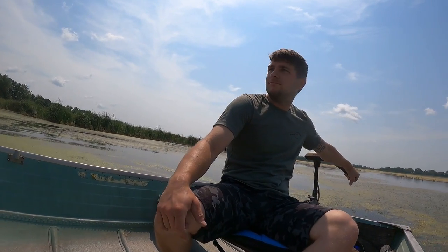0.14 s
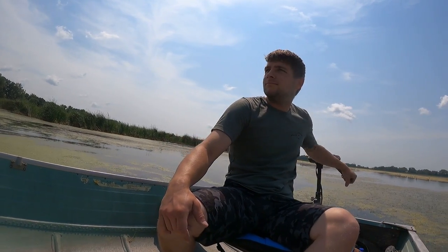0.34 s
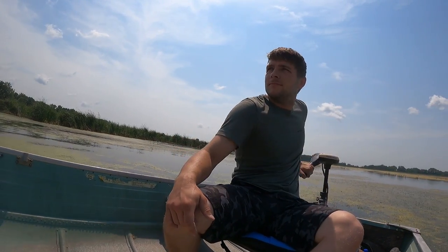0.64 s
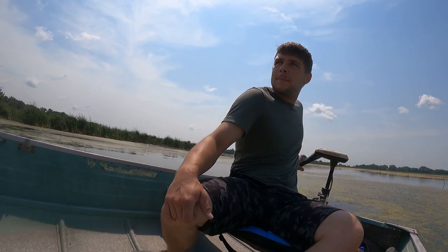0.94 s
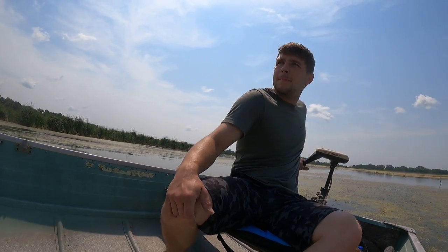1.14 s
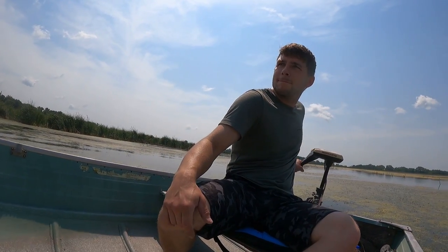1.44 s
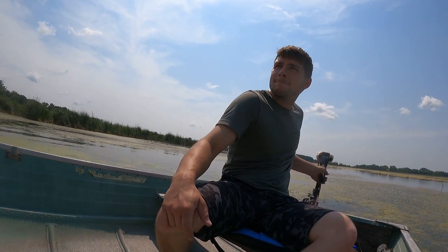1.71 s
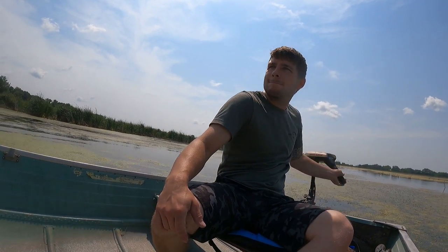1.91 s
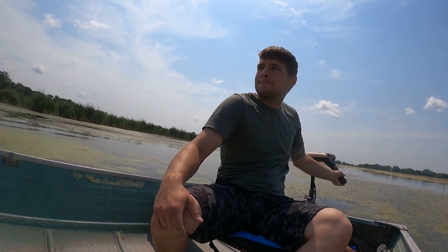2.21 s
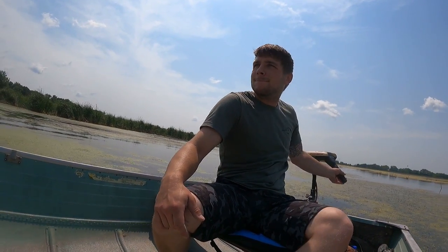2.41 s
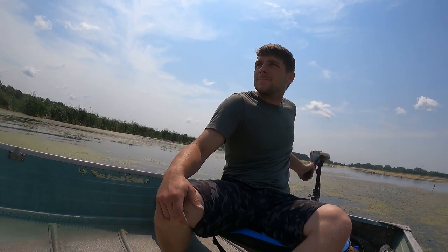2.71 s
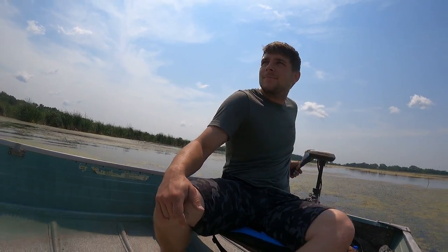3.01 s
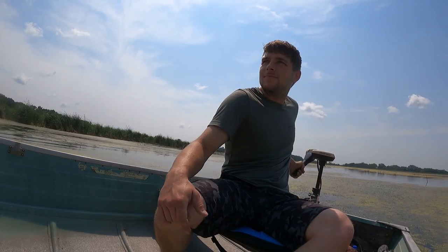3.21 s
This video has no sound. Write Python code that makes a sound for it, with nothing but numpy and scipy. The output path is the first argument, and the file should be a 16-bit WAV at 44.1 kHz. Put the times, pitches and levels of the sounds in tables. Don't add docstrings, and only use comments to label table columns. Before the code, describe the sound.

An electric boat motor buzzes in two bursts, shaking a metal hull, with knocks between them.

```python
import sys
import numpy as np
from scipy import signal
from scipy.io import wavfile
from scipy.ndimage import uniform_filter1d

SR = 44100
rng = np.random.default_rng(int(sys.argv[2]) if len(sys.argv) > 2 else 0)


def generate_wav(signal):
    frames = np.transpose(np.atleast_2d(signal))
    scaled = np.clip(frames, -1, 1) * 32767
    pcm = np.round(scaled).astype(np.int16)
    wavfile.write(sys.argv[1], SR, pcm)


def volts_from_db(level):
    exponent = np.asarray(level, float) / 20
    return 10 ** exponent


N = 147735
TIME_S = np.arange(N) / SR


def col(table, index):
    rows = np.array(table, float)
    return np.interp(TIME_S, rows[:, 0], rows[:, index])


def gate(table):
    rise = (TIME_S - table[0][0]) / 0.0079
    fall = (table[-1][0] - TIME_S) / 0.027
    return np.clip(np.minimum(rise, fall), 0, 1)


def hump(start, length, steep):
    from_middle = np.abs(2 * (TIME_S - start) / length - 1)
    return np.clip(steep - steep * from_middle, 0, 1)


def unit(x):
    return x / np.sqrt(np.mean(x ** 2))


def peak(x):
    return x / np.abs(x).max()


def band(x, hz, width):
    return signal.lfilter(*signal.iirpeak(min(hz, .45 * SR), hz / width, SR), x)


def walk(rate):
    k = int(SR / rate)
    steps = np.repeat(rng.standard_normal(600), k)[:N]
    curve = uniform_filter1d(uniform_filter1d(steps, k), k)
    return (curve - curve.mean()) / curve.std()


def bands(source, table, lo_hz, hi_hz, flicker_db, rate):
    rows, out = np.array(table, float), 0
    for hz in lo_hz * 2 ** (np.arange(30) / 3):
        if hz < hi_hz:
            db = np.interp(np.log(hz), np.log(rows[:, 0]), rows[:, 1]) + flicker_db * walk(rate)
            out = out + volts_from_db(db) * band(band(source, hz, hz / 3), hz, hz / 3)
    return unit(out)


def motor_grit():
    roughness_db = 1.5 * 8 * uniform_filter1d(rng.standard_normal(N), size=60)
    return unit(rng.standard_normal(N) * volts_from_db(roughness_db))


# time_s, buzz level_db
MOTOR_LOAD = [
    [(.222, -32.5), (.29, -27), (.4, -32.5), (.52, -33), (.75, -34.5), (.83, -36), (.9, -37), (.96, -56.5)],
    [(1.475, -47.5), (1.51, -33), (1.7, -33), (2.25, -35), (2.42, -31.5), (2.72, -34), (3.0, -32.5),
     (3.09, -49)],
]


def motor_load():
    return [gate(burst) * volts_from_db(col(burst, index=1)) for burst in MOTOR_LOAD]


# start_s, length_s, peak level_db, pitch_hz
SURGES = [(.235, 0.017, -18, 265), (.255, 0.032, -14.5, 269.9), (.301, 0.049, -19.5, 272.7),
          (.338, 0.051, -8.5, 279.4), (.397, 0.032, -8, 277.6), (.44, 0.055, -10, 278.2),
          (.495, 0.064, -15.5, 279.8), (.57, 0.032, -17.5, 278), (.614, 0.19, -9.5, 277.7),
          (.803, 0.034, -23, 277), (.86, 0.026, -23.5, 275), (.895, 0.018, -24.5, 277),
          (1.498, 0.053, -11.5, 283.8), (1.578, 0.019, -10, 277.6), (1.609, 0.029, -17.5, 288.8),
          (1.65, 0.03, -15, 269.3), (1.696, .03, -20, 277), (1.736, 0.012, -16, 286),
          (1.775, 0.028, -17.5, 277.9), (1.828, 0.02, -7, 290.6), (1.869, 0.011, -11, 266.7),
          (1.918, 0.1, -18, 280), (2.023, 0.026, -11.5, 282.8), (2.058, 0.049, -12, 282.2),
          (2.134, 0.014, -15, 288), (2.166, 0.085, -15, 278), (2.26, 0.014, -11, 299.2),
          (2.29, 0.02, -11, 296.2), (2.32, 0.038, -13.5, 292.8), (2.374, 0.013, -15, 280.2),
          (2.401, 0.011, -22, 309.7), (2.43, .04, -15, 285.2), (2.485, 0.023, -12, 286.5),
          (2.516, 0.019, -14, 273.3), (2.54, 0.027, -12.5, 283.1), (2.57, 0.026, -11.5, 279.8),
          (2.605, .05, -15, 277), (2.674, 0.03, -14, 285.5), (2.704, 0.036, -17, 296.4),
          (2.745, .11, -10, 274), (2.88, 0.023, -20.5, 280.2), (2.913, 0.067, -19, 283.4),
          (2.997, 0.012, -14.5, 271.9), (3.02, 0.044, -20, 277.7), (3.08, 0.029, -27.5, 280.4)]
SURGE_RISE_S, SURGE_FALL_S = 0.0077, 0.016


def hull_surge():
    surge = 0
    for start, length, db, _ in SURGES:
        rise = (TIME_S - start) / SURGE_RISE_S + .5
        fall = (start + length - TIME_S) / SURGE_FALL_S + .5
        surge = surge + volts_from_db(db) * np.clip(np.minimum(rise, fall), 0, 1)
    return surge


# time_s, level_db
HULL_NOTE = [
    [(.225, -34.5), (.83, -24), (.95, -28), (1.05, -28.5)],
    [(1.475, -44), (1.5, -38), (3.05, -35.5), (3.16, -29.5)],
]
# waver_db, wavers per s
WAVER = [
    (1.0, 35),
    (2.0, 60),
]
PHASE_WANDER_RAD, SURGE_SLIP_RAD = 0.45, 0.9


def hull_note(surge):
    pitch = np.interp(TIME_S, [s + d / 2 for s, d, _, _ in SURGES], [row[3] for row in SURGES])
    bite = np.searchsorted([row[0] for row in SURGES], TIME_S)
    slip = uniform_filter1d(SURGE_SLIP_RAD * rng.standard_normal(80)[bite], size=300)
    out = 0
    for note, (waver_db, rate) in zip(HULL_NOTE, WAVER):
        phase = 2 * np.pi * np.cumsum(pitch) / SR + PHASE_WANDER_RAD * walk(rate) + slip
        waver = volts_from_db(2 * waver_db * np.tanh(walk(rate) / 2))
        size = (volts_from_db(col(note, index=1)) + surge) * waver * gate(note)
        out = out + size * np.sin(phase)
    return out


# pitch_hz, width_hz, level_db
HULL_MODES = [(238.4, 47, -5.5), (277, 47.4, -3.5), (312, 36, -2.5), (351, 51, -5.5), (378, 120, -15),
              (560, 64, -11.5)]
NEIGHBOUR_DB = [8.8, 9.9]


def hull_neighbours(grit, loads):
    modes = 0
    for k, (hz, width, db) in enumerate(HULL_MODES):
        modes = modes + (-1) ** k * volts_from_db(db) * unit(band(grit, hz, width))
    modes = unit(modes)
    modes = modes / np.sqrt(uniform_filter1d(modes ** 2, size=5000))
    return modes * sum(load * volts_from_db(db) for load, db in zip(loads, NEIGHBOUR_DB))


# pitch_hz, level_db per Hz
BUZZ = [(400, 10.5), (600, 12), (800, 12), (1350, -12), (1750, -14.5), (2600, -19.5), (5300, -52),
        (8000, -45)]
TRANSOM_HZ, TRANSOM_WIDTH_HZ, TRANSOM_DB = 1135, 240, -17.5


def motor_hiss(grit, surge):
    hiss = bands(grit, BUZZ, 417.0, 13000, flicker_db=1.2, rate=16)
    hiss = hiss * volts_from_db(0.8 * walk(19)) * (0.97 + 0.49 * surge)
    transom = band(band(grit, TRANSOM_HZ, TRANSOM_WIDTH_HZ), TRANSOM_HZ, TRANSOM_WIDTH_HZ)
    return volts_from_db(0.5) * hiss + volts_from_db(TRANSOM_DB) * unit(transom)


TUBE_HZ = [2925, 3620, 4360, 5220, 6190, 7290]
# width_hz, level_db above load
TUBE = [(70, -35.5), (109, -37), (45, -37.5), (42.56, -38), (60, -50), (90, -54.5)]
# start_s, length_s, level_db over its steady ring
RATTLES = [(0.264, 0.04, 1), (0.319, 0.046, 11), (.37, 0.028, 1), (0.446, 0.057, 10.5),
           (0.494, 0.052, 14.5), (0.593, 0.053, 14), (0.69, 0.066, 9), (0.741, 0.047, 11.5),
           (1.497, 0.045, 12), (1.674, 0.043, 4), (1.99, .046, 6), (2.191, 0.056, 5.5),
           (2.346, 0.037, 12.5), (2.401, 0.032, 10), (2.429, .065, 11.5), (2.522, 0.05, 12.5),
           (2.628, 0.042, 10), (2.714, 0.069, 8), (2.773, 0.052, 11), (2.878, 0.032, 11),
           (2.975, 0.045, 11.5)]
TUBE_PATCHY_DB, RATTLE_HISS_DB = 1.1, -40.5


def shaft_tube(grit):
    patch = walk(60)
    tube = 0
    for hz, (width, db) in zip(TUBE_HZ, TUBE):
        patchy_db = db + TUBE_PATCHY_DB * (patch + walk(40))
        tube = tube + volts_from_db(patchy_db) * unit(band(grit, hz, width))
    tube = tube + volts_from_db(RATTLE_HISS_DB) * unit(band(band(grit, 3800, 7800), 3800, 6300))
    return tube * volts_from_db(sum(db * hump(s, d, 2) for s, d, db in RATTLES))


def motor():
    grit, loads, surge = motor_grit(), motor_load(), hull_surge()
    buzz = motor_hiss(grit, surge) + shaft_tube(grit)
    buzz = buzz - .8 * band(buzz, 5560, 420)
    return hull_note(surge) + hull_neighbours(grit, loads) + sum(loads) * buzz


# start_s, peak level_db, treble level_db, contact_ms, main ring pitch_hz
KNOCKS = [
    (0.856, -17, -20, 9.5, 1050),
    (1.149, -26, -18, 5.1, 1218),
    (1.1632, -17, -23, 12, 1100),
    (1.1958, -18, -24, 3.4, 1310),
    (1.2275, -43, -24, 2.66, 1005),
    (1.8253, -26.5, -3.5, 1.7, 1206),
    (1.909, -17, -20.5, 9.2, 1150),
    (1.953, -18, -28, 3.3, 1242),
    (3.0866, -30.5, -5.5, 1.9, 1690),
    (3.1274, -38, 1, 5.4, 1421),
]
# ratio to main ring, width_hz, level_db
MOUNT_LOW = [(.26, 140, -8), (.58, 300, -10), (1.0, 190, 0), (1.2, 300, -6), (2.1, 900, -15)]
# pitch_hz, width_hz, level_db
MOUNT_HIGH = [(2870, 270, -2.5), (4030, 700, -2), (4730, 510, -2.5), (6800, 950, 4.5), (7700, 1000, -8.5),
              (12400, 1400, 2.5)]
KNOCK_SCATTER_DB, KNOCK_RISE_S = 2.5, 0.0028
KNOCK_TAIL_S, KNOCK_TAIL_DB = 0.028, -21.5


def tiller_knocks():
    out, t = np.zeros(N + 9000), np.arange(9000) / SR
    for start, db, treble_db, contact_ms, ring_hz in KNOCKS:
        scatter = KNOCK_SCATTER_DB * rng.standard_normal((2, 6))
        noise = rng.standard_normal((2, len(t)))
        push = noise[0] * np.exp(-t / (max(contact_ms, 2) * 1e-3)) * np.minimum(t / KNOCK_RISE_S, 1)
        low = high = 0
        for (ratio, width, mode_db), extra_db in zip(MOUNT_LOW, scatter[0]):
            hz = ring_hz * ratio
            low = low + volts_from_db(mode_db + extra_db) * peak(band(band(push, hz, width), hz, 4 * width))
        for (hz, width, mode_db), extra_db in zip(MOUNT_HIGH, scatter[1]):
            high = high + volts_from_db(mode_db + extra_db) * peak(band(band(push, hz, width), hz, 3 * width))
        tail = band(band(noise[1], 840, 1600), 950, 2500)
        tail = tail * np.exp(-t / KNOCK_TAIL_S) * (1 - np.exp(-t / 0.0011))
        hit = peak(low) + volts_from_db(treble_db) * peak(high) + volts_from_db(KNOCK_TAIL_DB) * peak(tail)
        first = int(start * SR)
        out[first:first + len(t)] += volts_from_db(db) * hit
    return out[:N]


# start_s, peak level_db, colour pitch_hz
TICKS = [(.0, -37.5, 2200), (0.045, -42.5, 1800), (0.117, -46, 2300), (.142, -50, 2560),
         (0.178, -43.5, 1800), (.9393, -44, 1500), (1.0162, -44, 1564), (1.037, -39, 2210),
         (1.1024, -47.5, 1800), (1.271, -47.5, 1890), (1.3106, -42.5, 2100), (1.4448, -46, 2590),
         (1.463, -50.5, 3710), (2.157, -42, 3800), (3.232, -45.5, 2100), (3.277, -50, 2000),
         (3.304, -59, 2500), (3.336, -45, 880), (3.079, -45, 2480)]


def tiller_ticks():
    out, t = np.zeros(N + 9000), np.arange(9000) / SR
    for start, db, hz in TICKS:
        grain = rng.standard_normal(len(t)) * np.exp(-t / 0.0071) * np.minimum(t / 0.002 * 4 / 4 * 1e-3 / 1e-3, 1)
        grain = band(band(grain, hz, hz), hz, hz * 2)
        first = int(start * SR)
        out[first:first + len(t)] += volts_from_db(db) * peak(grain)
    return out[:N]


# start_s, length_s, level_db
DRAGS = [
    (.0, 0.024, -37),
    (1.125, 0.21, -29.5),
    (1.798, 0.073, -39),
    (1.861, 0.17, -28),
    (1.945, 0.069, -28),
    (3.072, 0.14, -40),
]
DRAG_LOW_HZ, DRAG_HIGH_HZ = 180, 1350
DRAG_SCRAPE_DB, DRAG_BOOM_DB = -19.5, 4


def tiller_drags():
    rub_filter = signal.butter(3, (DRAG_LOW_HZ, DRAG_HIGH_HZ), "band", fs=SR)
    rub = signal.lfilter(*rub_filter, rng.standard_normal(N))
    scrape = volts_from_db(DRAG_SCRAPE_DB) * unit(band(rng.standard_normal(N), 3500, 4000))
    boom = volts_from_db(DRAG_BOOM_DB) * unit(band(rub, 230, 190))
    pull = 0
    for start, length, db in DRAGS:
        along = (TIME_S - start) / length
        pull = pull + volts_from_db(db) * np.clip(np.minimum(4 * along, 1 - along), 0, 1) ** 2
    return (unit(rub) + scrape + boom) * volts_from_db(0.82 * walk(65)) * pull


# start_s, length_s, peak level_db, pitch_hz
GULPS = [(.0, 0.063, -23, 141.5), (.09, 0.12, -26, 159), (.195, 0.061, -22.5, 144),
         (.26, 0.057, -26.5, 137.5), (.73, 0.079, -27, 87.2), (.97, 0.017, -25.5, 90),
         (1.145, 0.066, -28, 138), (1.21, 0.067, -31.5, 254.4), (1.27, 0.055, -31, 217.6),
         (1.3, 0.096, -39, 96), (1.48, 0.077, -24, 197.6), (1.62, 0.064, -21.5, 225.4),
         (1.901, 0.084, -22, 150), (2.032, .06, -22, 98), (2.2, 0.045, -24, 85), (2.45, 0.066, -24.5, 85.5),
         (3.0, 0.095, -28, 89), (3.25, 0.09, -33, 133)]
GULP_SAG_PER_S = 0.68


def gulps():
    out = 0
    for start, length, db, hz in GULPS:
        t = TIME_S - start
        out = out + volts_from_db(db) * hump(start, length, 2) * np.sin(2 * np.pi * hz * t * (1 - GULP_SAG_PER_S * t / 2))
    return out * volts_from_db(1.1 * walk(53))


# pitch_hz, level_db per Hz
WATER = [(12, -44), (20, 3.5), (157, 3.5), (615, -29), (1170, -24.5), (1410, -46.5), (1790, -35),
         (5670, -53), (12000, -83), (15600, -112), (22000, -120)]
# time_s, slap level_db, ripple level_db
SLOSH = [(0.0, -30.5, -46.5), (0.25, -25.5, -42.5), (0.71, -40.5, -38), (0.74, -35, -49),
         (1.44, -35.5, -53), (1.53, -29, -49), (1.7, -32.5, -34.5), (2.06, -23, -47), (2.14, -33, -44),
         (3.19, -34, -49), (3.35, -31, -52)]
# pitch_hz, width_hz, level_db
KEEL = [
    (81.4, 18, -4),
    (129.5, 18, -10.5),
]


def water():
    noise = rng.standard_normal(N)
    keel = sum(volts_from_db(db) * unit(band(band(noise, hz, w), hz, 2 * w)) for hz, w, db in KEEL)
    slap = bands(noise, WATER, 23.12, 330, flicker_db=2.3, rate=9) + keel
    ripple = bands(rng.standard_normal(N), WATER, 315, 12000, flicker_db=2.1, rate=14)
    ripple_db = col(SLOSH, index=2) + 1.2 * walk(2.2)
    return slap * volts_from_db(col(SLOSH, index=1) - 1.0) + ripple * volts_from_db(ripple_db)


# start_s, length_s, pitch_hz, level_db, glide in Hz per s
PEEPS = [
    (0.022, 0.033, 3200, -67, -4000),
    (0.082, .04, 4660, -65, 3994),
    (0.121, 0.026, 3630, -59, 34997),
    (0.205, 0.0096, 4940, -64, 0),
    (.965, 0.024, 4920, -65, -5.5),
    (1.37, .015, 5420, -65, 4),
    (1.409, 0.023, 4836, -63, -4),
]


def birds():
    out = 0
    for start, length, hz, db, glide in PEEPS:
        t = TIME_S - start
        phase = 2 * np.pi * (hz + glide * t / 2) * t + 2.5 * walk(90)
        out = out + volts_from_db(db) * hump(start, length, 1) * np.sin(phase)
    return out


def scene():
    tiller = tiller_knocks() + tiller_ticks() + tiller_drags()
    return (motor() + tiller + gulps() + water() + birds())[None]


def roll_off(x):
    return signal.sosfilt(signal.butter(12, 14940, fs=SR, output="sos"), x)


def record(dry):
    dull = signal.sosfilt(signal.butter(2, 6800, fs=SR, output="sos"), dry)
    dull = dull - 0.72 * band(dull, 11200, 1800)
    hiss = volts_from_db(-94.5) * unit(band(band(rng.standard_normal(N), 12800, 2500), 12800, 3000))
    heard = signal.sosfilt(signal.butter(6, 13700, fs=SR, output="sos"), dull + hiss)
    return roll_off(heard)


dry = scene()
out = record(dry)
generate_wav(out)
```